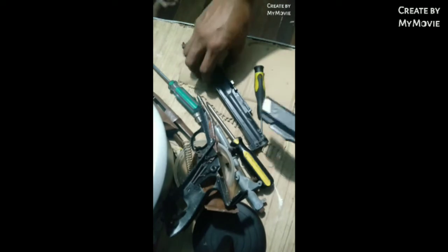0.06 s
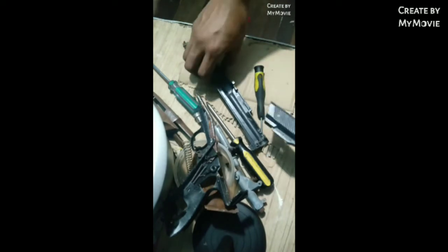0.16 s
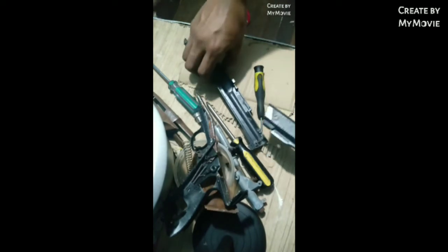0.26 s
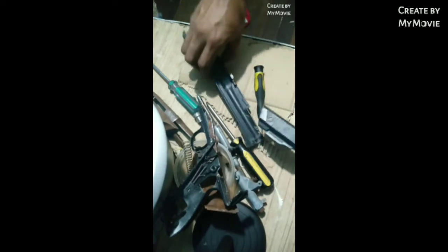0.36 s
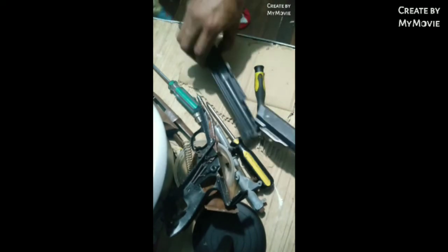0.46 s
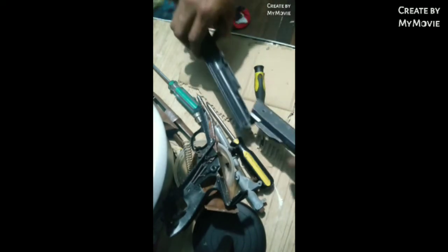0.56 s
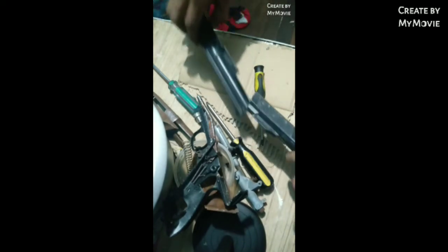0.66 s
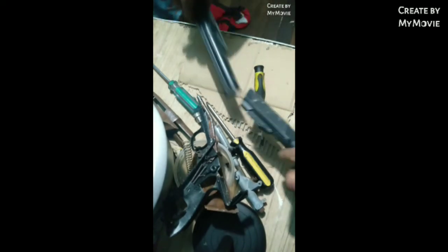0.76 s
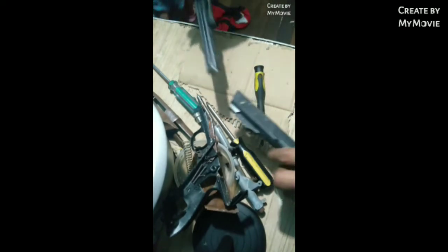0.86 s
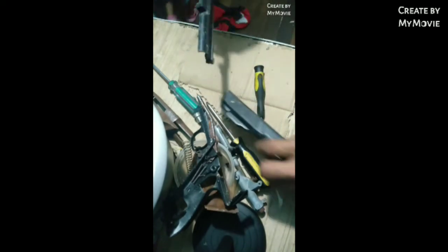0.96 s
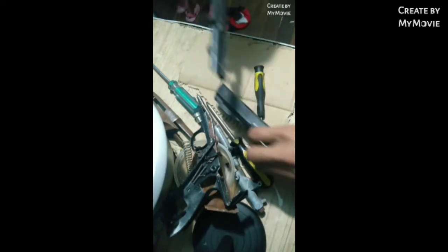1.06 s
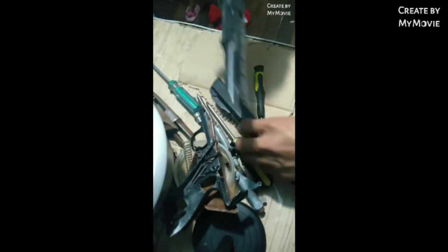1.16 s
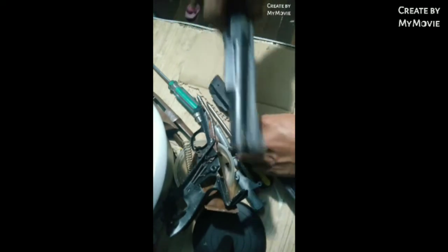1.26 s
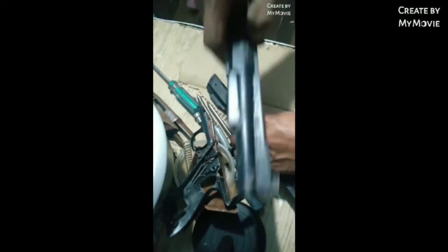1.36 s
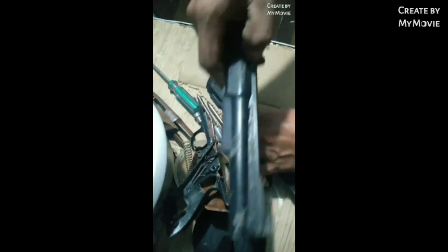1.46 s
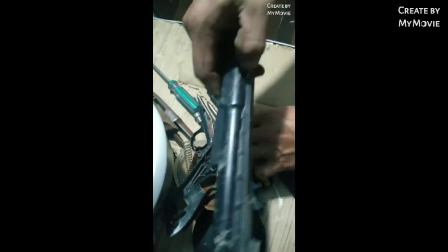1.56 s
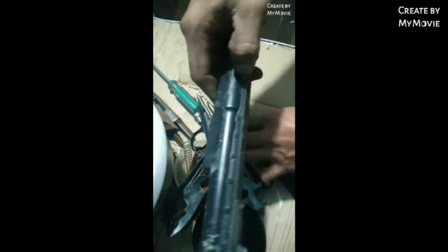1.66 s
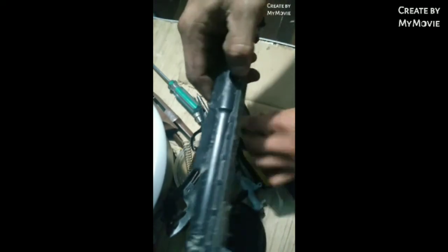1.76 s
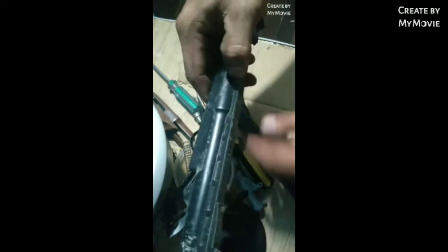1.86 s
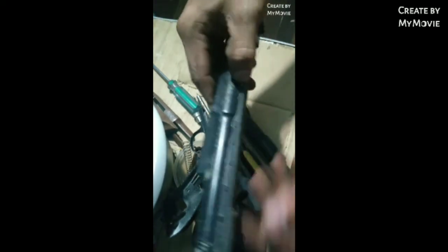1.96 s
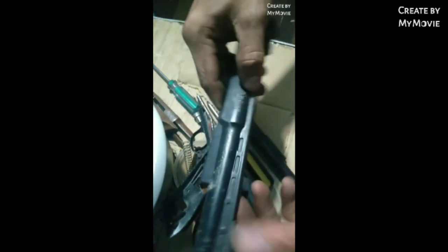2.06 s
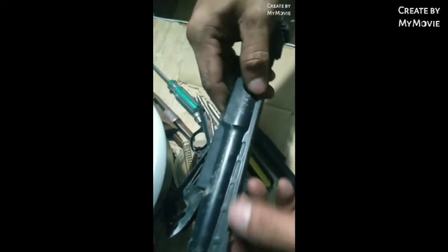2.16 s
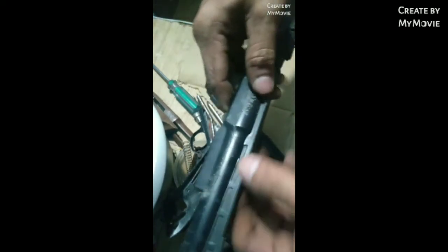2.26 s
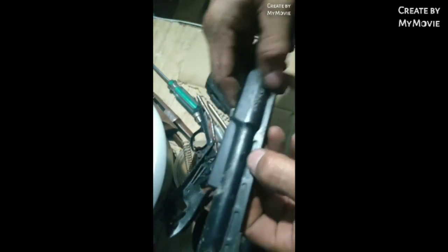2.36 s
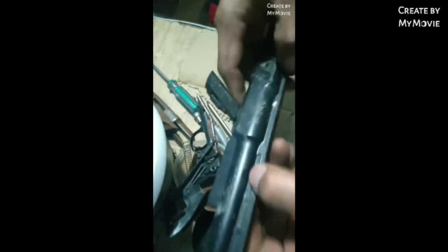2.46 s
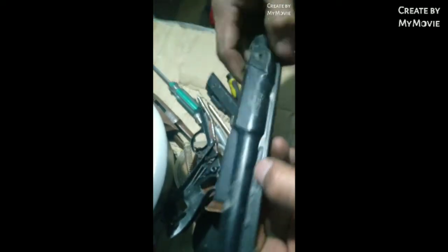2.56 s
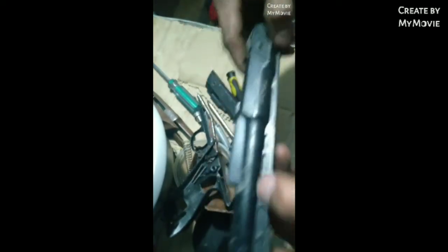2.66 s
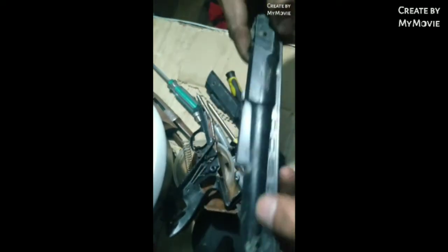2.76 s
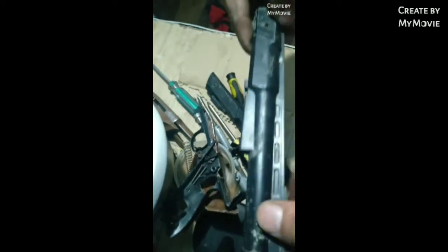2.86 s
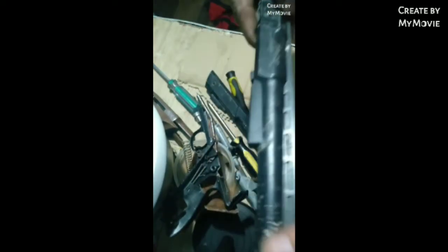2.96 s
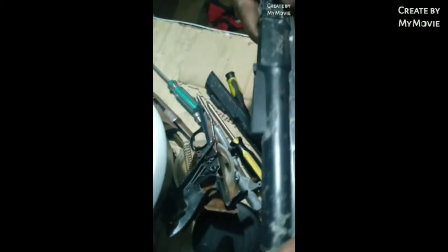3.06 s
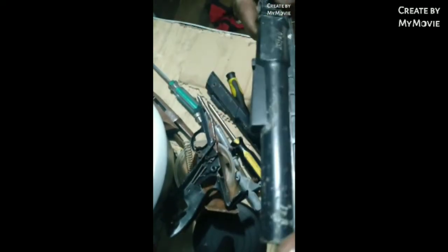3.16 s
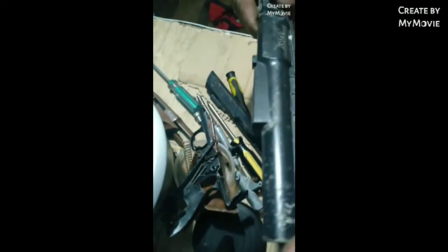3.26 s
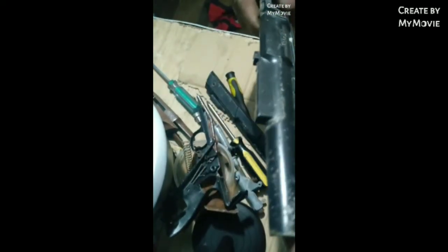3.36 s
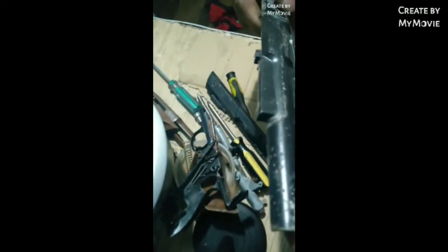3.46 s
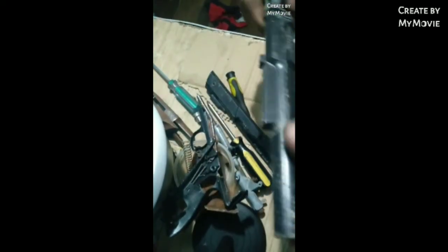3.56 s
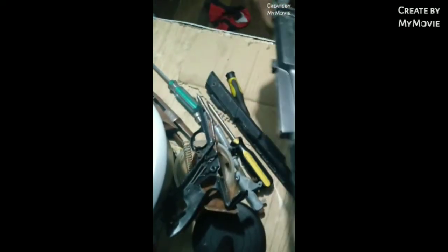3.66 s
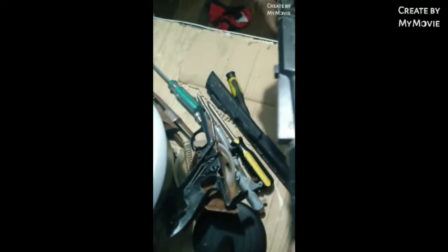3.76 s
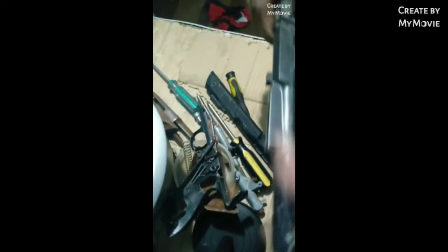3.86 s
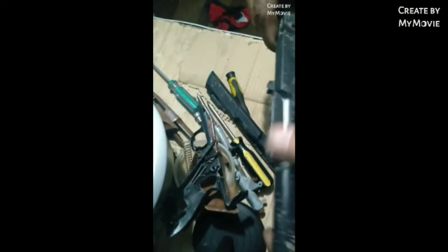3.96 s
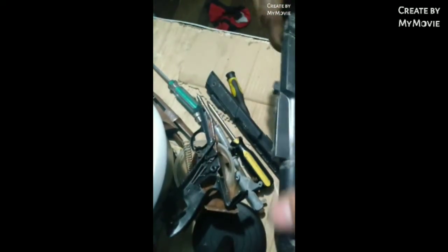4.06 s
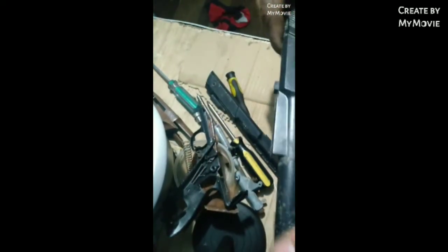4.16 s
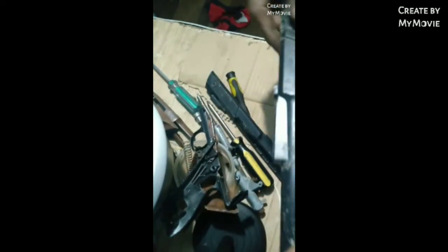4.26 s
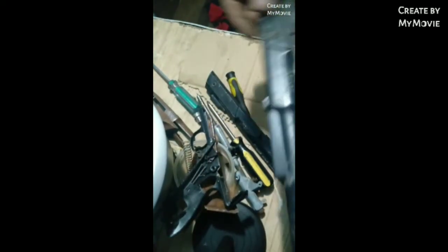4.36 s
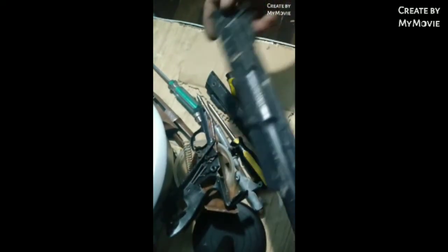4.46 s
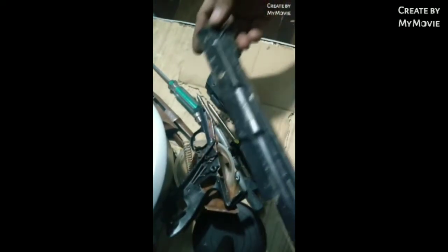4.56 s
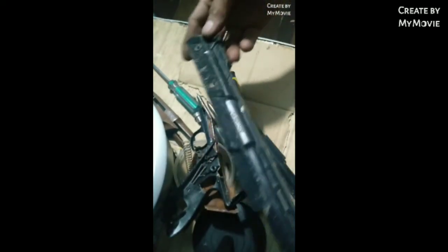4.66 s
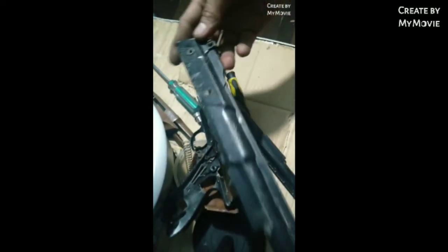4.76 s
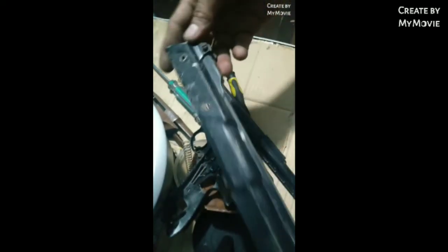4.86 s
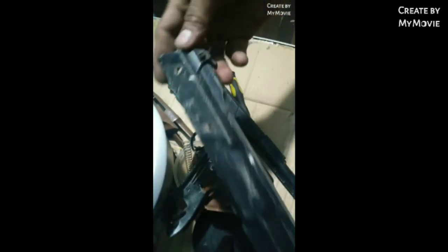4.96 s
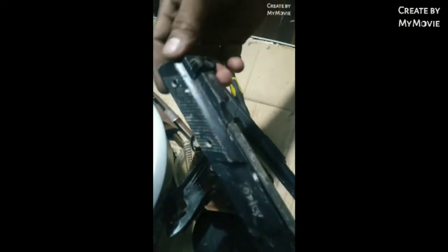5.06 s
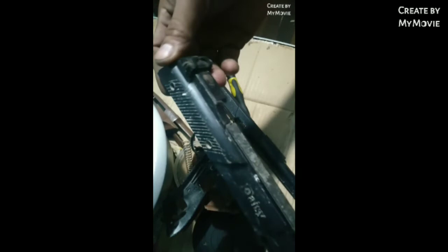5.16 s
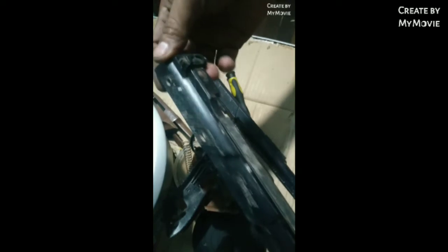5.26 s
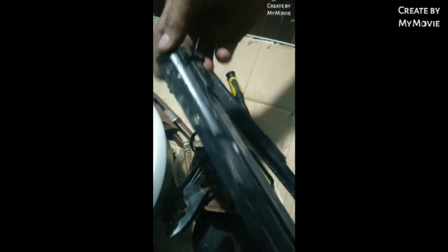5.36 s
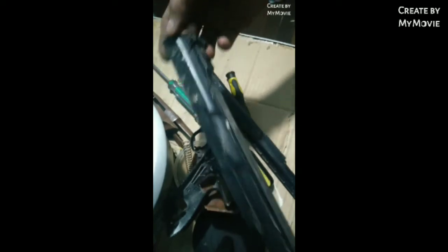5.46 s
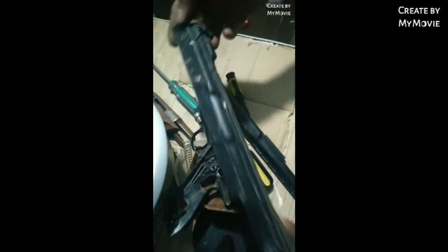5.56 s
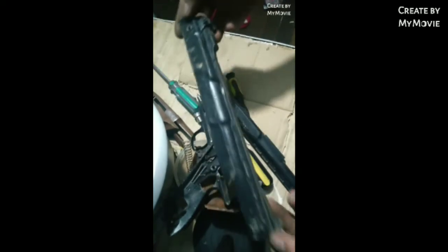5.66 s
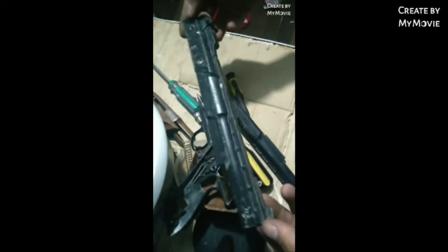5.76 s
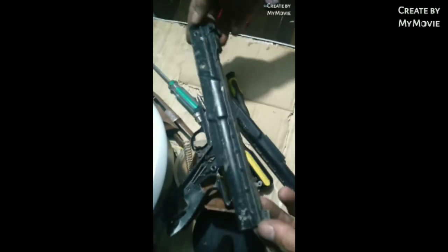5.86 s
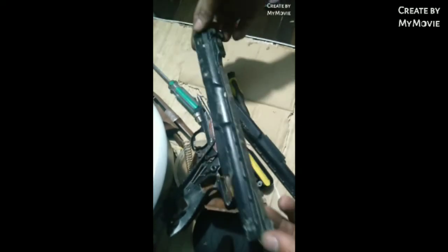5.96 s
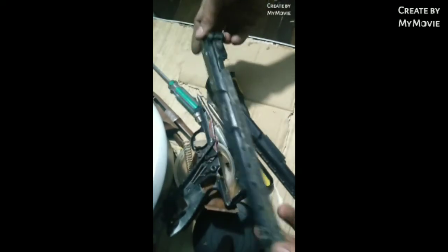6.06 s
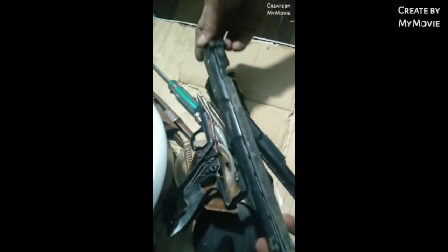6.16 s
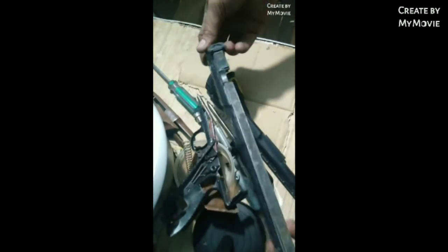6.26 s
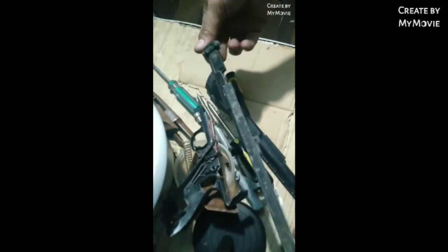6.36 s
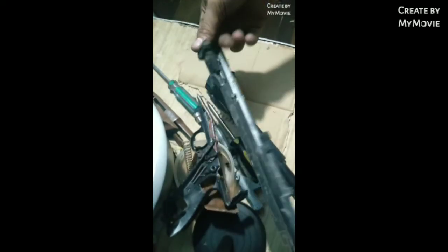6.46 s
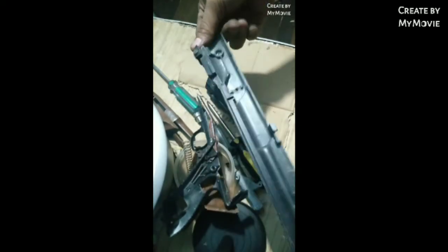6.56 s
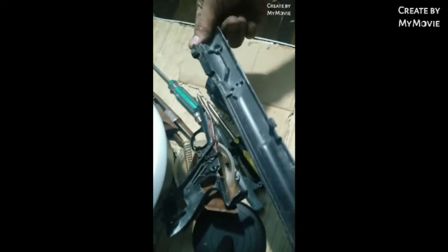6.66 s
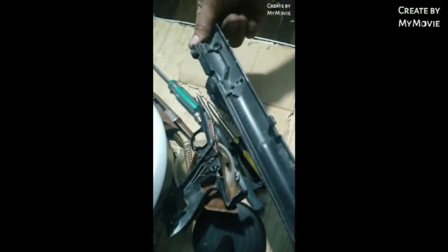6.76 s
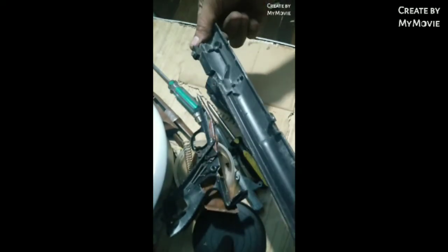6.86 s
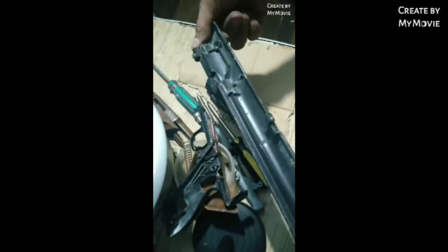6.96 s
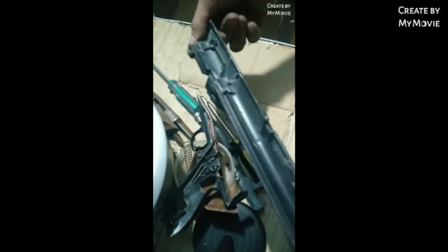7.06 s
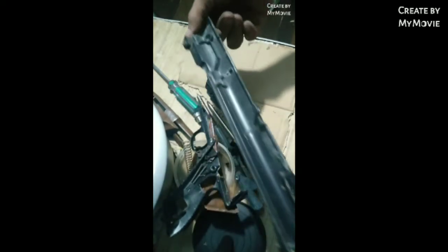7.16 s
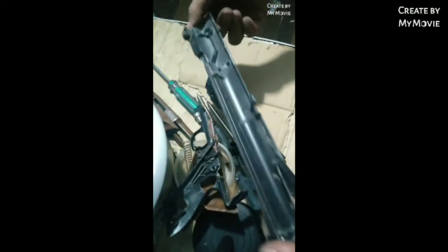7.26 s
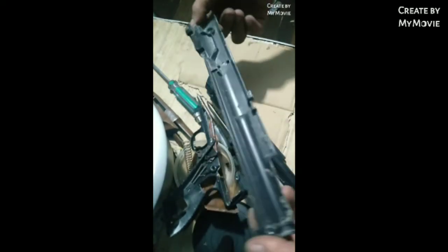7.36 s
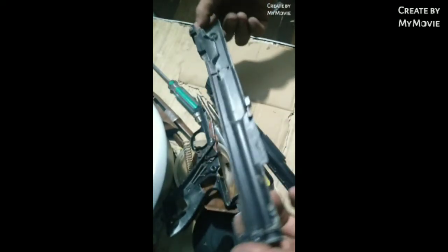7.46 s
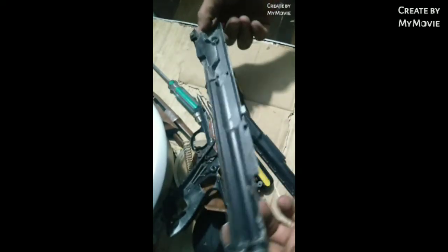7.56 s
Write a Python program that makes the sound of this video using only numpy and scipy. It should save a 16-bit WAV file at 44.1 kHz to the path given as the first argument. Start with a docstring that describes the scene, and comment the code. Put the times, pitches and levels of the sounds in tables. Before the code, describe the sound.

Thin steel tool ticks, then a loud clattering drop onto cardboard, followed by scattered metallic clicks, scrapes and dull knocks over faint hum.

```python
"""In a small room, steel parts and tools are lifted, turned in the hands and dropped on a cardboard sheet.
Contacts are clumped noise bursts that ring steel modes, thuds are damped swings with the sheet's modes.
Fingers slide as patchy noise through resonances, thin wavering tones come and go, cardboard creaks.
A faint fuzzy hum and hiss lie underneath; the microphone's noise suppressor lowers sound near the usual level."""
import sys
import numpy as np
from scipy import signal
from scipy.fft import rfft, irfft
from scipy.io import wavfile
from scipy.ndimage import uniform_filter1d

SR = 44100
rng = np.random.default_rng(int(sys.argv[2]) if len(sys.argv) > 2 else 0)


def store_pcm(level_fs):
    """Save levels as 16-bit WAV."""
    pcm = np.round(np.clip(level_fs, -1, 1) * 32767).astype(np.int16)
    wavfile.write(sys.argv[1], SR, np.atleast_2d(pcm).T)


N = 335380

SUPPRESS_DB = 8  # greatest depth by which the suppressor lowers sound


def amp(db):
    """Amplitude factor of a level in dB."""
    return 10 ** (np.asarray(db) / 20)


def evened(x):
    """The signal scaled to rms 1."""
    return x / np.sqrt(np.mean(x ** 2) + 1e-20)


def peaked(x, db):
    """The signal scaled to a peak level in dB."""
    return amp(db) * x / abs(x).max()


def read(points, hz):
    """A curve of (Hz, value) points, read along log frequency."""
    point_hz, value = np.transpose(points)
    return np.interp(np.log(hz + 1), np.log(point_hz + 1), value)


def add(mix, start_s, sound):
    """Lay a sound into the mix at its start time."""
    part = mix[round(start_s * SR):][:len(sound)]
    part += sound[:len(part)]


def noise(points, size):
    """Noise of rms 1 with the spectrum points (Hz, dB)."""
    spectrum = rfft(rng.standard_normal(size))
    colour = amp(read(points, np.fft.rfftfreq(size, 1 / SR)))
    return evened(irfft(spectrum * colour, size))


def ringing(modes, tilt_db=0, spread_db=0):
    """Impulse response of a body, energy 1; the place struck changes the share of each mode."""
    hz, db, t60_s = np.transpose(modes)[:, :, None]
    t = np.arange(SR // 2) / SR
    db = db + tilt_db * np.log2(hz / 3000) + spread_db * rng.standard_normal(hz.shape)
    swings = np.sin(2 * np.pi * (hz * t + rng.random(hz.shape)))
    response = (amp(db - 60 * t / t60_s) * swings).sum(0)
    return response / np.linalg.norm(response)


def hiss():
    """Steady coloured noise."""
    # hiss spectrum: pitch_hz [Hz], level_db [dB per Hz, relative]
    colour = [(20, -44), (40, -27.5), (70, -15), (110, -3), (160, -20.5), (350, -29), (520, -28),
              (1100, -33.5), (1900, -31.5), (4500, -39), (8600, -35), (10500, -39.5), (13000, -59),
              (15000, -56.5)]
    return amp(-71.5 + SUPPRESS_DB) * noise(colour, N)  # raised to make up for the suppressor


def hum():
    """A steady tone made slightly fuzzy by narrow noise around its pitch."""
    hum_hz, width_hz = 118.5, 56
    t = np.arange(N) / SR
    pole = np.exp(-np.pi * width_hz / SR)
    waver = signal.lfilter([1], [1, -pole], rng.standard_normal((2, N)))
    fuzz = evened(waver[0]) + 1j * evened(waver[1])
    tone = ((3. + fuzz) * np.exp(2j * np.pi * hum_hz * t)).real
    return amp(-70 + SUPPRESS_DB) * evened(tone)


def rustle():
    """Low lumpy creaks of the cardboard as hands shift the pile, and dense pips that follow the same level."""
    # level curve of the shifting pile: time_s [s], level_db [dB, applied to creaks and pips]
    pile_level = [(0.0, -68.5), (0.91, -78.5), (1.099, -53.5), (1.27, -52), (1.59, -84), (1.92, -85),
                  (2.14, -66.5), (3.05, -83.5), (3.941, -68), (4.68, -81), (5.02, -65), (5.44, -70.5),
                  (7.6, -62)]
    time_s, level_db = np.transpose(pile_level)
    lumps_db = 5.4 * evened(uniform_filter1d(rng.standard_normal(N), 1500))
    colour = [(150, -26.5), (240, -1.5), (340, 2), (450, -16.5), (700, -15), (1200, -40.0)]
    sheet = amp(lumps_db + 1.5) * noise(colour, N)
    t = np.arange(2000) / SR
    for hz in np.geomspace(550, 2600, 14):
        # small random pips, about 5 a second at each pitch, of random strength
        pips = (rng.random(N) < 5. / SR) * amp(4. * rng.standard_normal(N))
        pip = np.sin(2 * np.pi * hz * t) * np.hanning(len(t))
        sheet += amp(-9.) * signal.oaconvolve(pips, pip)[:N]
    return sheet * amp(np.interp(np.arange(N) / SR, time_s, level_db))


def slide(swell_s, fade_s, top_db, low_db, high_db):
    """Gritty friction through the part's resonances, in patches as the surfaces catch."""
    # resonances of the rubbed part: pitch_hz [Hz], width_hz [Hz, before 60 Hz of widening],
    # gain_db [dB, before scaling by 1.08]
    resonances = [(684, 58, 4), (1100, 23, -10), (1674, 41, 2.5), (2864, 50, 2.5), (3510, 110, -7),
                  (4450, 87, -13), (6125, 63, 3.5), (6800, 29, -2), (8200, 120, -13), (8593, 88, 1.5),
                  (9195, 190, 2), (11500, 49, -28)]
    start_db, end_db = -20, -7.5  # stroke level at its start and end, against its top
    t = np.arange(0, swell_s + fade_s, 1 / SR)
    swell_db = start_db * (1 - t / swell_s)
    fade_db = end_db * (t - swell_s) / fade_s
    stroke_db = top_db + np.where(t < swell_s, swell_db, fade_db)

    low = noise([(200, -22), (350, 6.5), (800, -10.5), (2000, -10.0), (2600, -32)], len(t))
    mid = noise([(1500, -36), (2200, -3.5), (6500, 4), (8000, -25)], len(t))
    high = noise([(6000, -50), (7500, 9.5), (10500, 6), (14000, -3.0)], len(t))
    friction = mid + amp(low_db) * low + amp(high_db) * high

    hz, _, z = signal.stft(friction, SR, nperseg=512, noverlap=384)
    body = amp(-14.0) + sum(amp(1.08 * gain_db) / (1 + (2 * (hz - pitch_hz) / (width_hz + 60.)) ** 2)
                            for pitch_hz, width_hz, gain_db in resonances)
    patches = uniform_filter1d(rng.standard_normal(z.shape), size=3, axis=0)  # across frequency
    patches = evened(uniform_filter1d(patches, size=14, axis=1))  # along time
    z = z * body[:, None] / body.mean() * amp(6.5 * patches)
    grit = signal.istft(z, nperseg=512, noverlap=384)[1][:len(t)]

    flutter_db = 1.9 * evened(uniform_filter1d(rng.standard_normal(len(t)), 300))
    catch = amp(stroke_db - 8.0 + flutter_db)
    return catch * grit * signal.windows.tukey(len(t), .1)


def slides():
    """Fingers and parts slide along metal, each stroke swelling and fading."""
    # strokes: start_s [s], swell_s [s], fade_s [s], top_db [dB, before an 8 dB trim],
    # low_db [dB, share under about 2 kHz], high_db [dB, share over about 7 kHz]
    strokes = [(2.3, .09, .11, -65, -7.5, 9), (3.835, 0.024, .022, -47.5, -9.5, -7),
               (4.75, .09, .21, -51.5, -5, -4), (6.365, .022, .045, -47, 4.5, -3.5),
               (7.43, .04, .13, -60, 10, -1)]
    out = np.zeros(N)
    for start_s, *stroke in strokes:
        add(out, start_s, slide(*stroke))
    return out


def thin_tones():
    """Thin, narrow wavering tones swell and fade."""
    # tones: start_s [s], length_s [s], pitch_hz [Hz], level_db [dB rms, before the swell and fade]
    tones = [(2.309, 0.17, 4763, -61.5), (2.304, 0.21, 5900, -59), (3.18, 0.18, 4833, -73),
             (4.092, 0.11, 9296, -62), (4.096, .099, 5400, -64.5), (4.75, 0.22, 2844, -60.5),
             (4.807, .098, 1097, -55)]
    out = np.zeros(N)
    for start_s, length_s, hz, db in tones:
        t = np.arange(round(length_s * SR)) / SR
        waver = uniform_filter1d(rng.standard_normal((2, len(t))), 500)
        wobble = 0.33 + evened(waver[0]) + 1j * evened(waver[1])
        tone = (wobble * np.exp(2j * np.pi * hz * t)).real
        add(out, start_s, amp(db) * evened(tone) * signal.windows.tukey(len(t), .6))
    return out


def thuds():
    """The sheet gives a damped swing at its own pitch, with its modes and a dull puff behind it."""
    # thuds on the cardboard: start_s [s], level_db [dB peak], pitch_hz [Hz]
    hits = [(0.019, -48, 269.2), (0.503, -39, 257.9), (0.888, -44, 161.6), (0.979, -27.5, 274.6),
            (1.008, -18.5, 360), (1.205, -11.5, 352.6), (1.268, -21.5, 131.7), (1.367, -39.5, 271.9),
            (1.464, -47, 235), (1.926, -31.5, 219.3), (2.058, -51.5, 126), (2.175, -26.5, 367.3),
            (2.48, -39, 453.8), (3.489, -35, 408), (3.503, -32, 359), (3.544, -25.5, 219.7),
            (3.878, -28.5, 240), (3.95, -28, 230.9), (4.81, -46.5, 703), (5.065, -42.5, 371.2),
            (5.066, -41, 609), (5.169, -46, 130.5), (6.384, -42, 285), (6.44, -32, 286.8),
            (6.714, -42, 340.8), (6.953, -28, 670), (6.952, -35.5, 282), (7.1, -46.5, 335.2),
            (7.129, -41.5, 283)]
    # modes of the sheet: pitch_hz [Hz], level_db [dB, relative], t60_s [s]
    sheet_modes = [(107, 0, .12), (164, -6.5, 0.08), (262, -3, 0.18), (324, 0, 0.091), (708, -15, 0.33),
                   (795, -17.5, .017)]
    out, t = np.zeros(N), np.arange(SR // 2) / SR
    rise = (1 - np.exp(-t / 0.0028)) ** 2
    fade = amp(-60 * t / 0.08)
    for start_s, db, hz in hits:
        swing = fade * np.sin(2 * np.pi * hz * t)
        puff = fade * noise([(50, -20), (hz, 0), (900, -12), (2500, -40), (6000, -80)], len(t))
        sheet = peaked(ringing(sheet_modes, spread_db=3.0), -6.5)
        add(out, start_s, peaked(rise * (swing + amp(-6.0) * puff + sheet), db))
    return out


def taps():
    """A thin tool shaft is tapped: a sharp tick and the ring of the shaft."""
    # taps: start_s [s], level_db [dB peak], brightness_db [dB per octave for the ring,
    # dB at 7 kHz for the tick]
    hits = [(0.1751, -25.5, -3), (0.2365, -26.5, -1.5), (0.2563, -34.5, -2.5), (0.3163, -25.5, 5.1),
            (0.3585, -19.5, 1.4), (0.4094, -34.5, 6)]
    # modes of the shaft: pitch_hz [Hz], level_db [dB, relative], t60_s [s]
    shaft_modes = [(1120, -13, .18), (1355, -18, .15), (1683, -7, .18), (2155, 2, .09), (2515, -6, .09),
                   (3460, -13, .1), (3813, -9, .12), (4275, -10, .09), (4785, -7, .11), (5387, -6, .1),
                   (5920, 0, .04), (8253, -10, .04)]
    out, t = np.zeros(N), np.arange(SR // 2) / SR
    thin = signal.butter(4, 950, "high", fs=SR, output="sos")  # a thin shaft radiates no bass
    rise = 1 - np.exp(-t / 0.00013)
    for start_s, db, tilt_db in hits:
        tick = noise([(1200, -5.5), (7000, tilt_db), (10000, -24.5)], len(t)) * amp(-60 * t / 0.062)
        tap = ringing(shaft_modes, tilt_db, 1.) + amp(-7) * tick / np.linalg.norm(tick)
        add(out, start_s, peaked(signal.sosfilt(thin, tap * rise), db))
    return out


def burst(db, body_db, tilt_db, top_db, rise_ms, t60_ms):
    """A rough rush of tiny collisions that come in clumps."""
    ms = np.arange(SR // 2) * 1000 / SR
    rise = (1 - np.exp(-ms / max(rise_ms, .1))) ** 2
    shape = rise * amp(-60 * ms / t60_ms)
    lumps = uniform_filter1d(uniform_filter1d(rng.standard_normal(len(ms)), 120), 120)
    clumps = amp(3. * np.minimum(ms / 8, 1) * evened(lumps))  # clumping grows over the first 8 ms
    middle_db = .6 * max(body_db, 0) + 0.28 * min(body_db, 0) + 3.5 - tilt_db / 3
    colour = [(250, body_db - 0.6), (1000, body_db - 1.0), (2500, middle_db),
              (3500, 2.0 - tilt_db / 2), (7000, tilt_db / 2),
              (12000, tilt_db / 2 + top_db + 0.5), (14500, tilt_db / 2 + top_db - 18)]
    return peaked(noise(colour, len(ms)) * shape * clumps, db)


def held(t60_s, count=40):
    """A part damped by the grip: many short modes that change with every hold."""
    return [(hz, 0, t60_s) for hz in np.sort(rng.uniform(500, 14000, count))]


def rung(x, modes, ring_db, spread_db):
    """The sound x and the ring it wakes in a body."""
    ring = signal.fftconvolve(x, ringing(modes, spread_db=spread_db))[:len(x)]
    return x + amp(ring_db) * ring * np.linalg.norm(x) / np.linalg.norm(ring)


def drops():
    """A loose steel part drops on the pile and rattles; it rings freely in all its modes."""
    # drops: start_s [s], level_db [dB peak of the clatter, before the ring joins],
    # brightness_db [dB per octave for the ring, scaled for the clatter], t60_ms [ms, clatter]
    falls = [(0.974, -16.5, -7, 97), (1.192, -15.5, 2.5, 74), (1.206, -12, -0.5, 69),
             (1.234, -19.5, -0.5, 79), (1.259, -21, -4.5, 130), (1.282, -27, -4, 73)]
    # modes of the loose steel: pitch_hz [Hz], level_db [dB, relative], t60_s [s]
    steel_modes = [(2160, -9, .15), (2510, -8, .17), (3462, -2, .17), (3811, -7, .2), (3930, -12, .15),
                   (4888, -3, .17), (5134, -1, .16), (5671, 0, .16), (6514, -14, .17), (6901, -11, .17),
                   (7140, -7, .13), (7450, -12, .17), (8664, -4, .3), (9606, -4, .15), (9918, -7, .12),
                   (10389, -5, .17), (11000, -8, .13), (12350, -13, .15), (13300, -14, .15),
                   (13906, -13, .13)]
    out, t = np.zeros(N), np.arange(SR // 2) / SR
    rise = 1 - np.exp(-t / 0.0016)
    for start_s, db, tilt_db, t60_ms in falls:
        clatter = burst(db, 1, 0.55 * tilt_db, -5.0 + 1.8 * tilt_db, 0.82, t60_ms)
        ring = ringing(steel_modes, tilt_db) * rise
        add(out, start_s, clatter + amp(.3) * np.linalg.norm(clatter) * ring)
    return out


def contacts():
    """Parts in the hand touch: a crack wakes short damped modes and one stronger pitch."""
    # contacts: start_s [s], level_db [dB peak], body_db [dB, 1 kHz body over 5 kHz crack, nominal],
    # brightness_db [dB per octave, nominal], t60_ms [ms, crack], ring_hz [Hz]
    touches = [(0.047, -43, -11.5, -4.5, 46, 5663), (0.883, -38.5, -9, -12.5, 89, 2240),
               (0.932, -32.5, -5.5, 6.5, 140, 2090), (0.947, -36.5, -8, -0.5, 93, 5600),
               (1.918, -34.5, 25, -18, 76, 1470), (2.175, -25, 24, 13, 92, 795),
               (2.477, -29, 12.5, 0, 100, 1770), (2.51, -31.5, 25.5, 18, 110, 650),
               (2.548, -31, -2.5, 6.5, 70, 9270), (2.608, -42, -20, -8, 100, 5760),
               (3.271, -39, 1.5, 26, 190, 8930), (3.484, -27.5, 2.5, -20, 220, 869),
               (3.497, -23, -14.5, -2, 43, 3196), (3.505, -16, 4.5, 8.5, 95, 919.6),
               (3.639, -37.5, -6.5, 16, 200, 8950), (3.875, -21.5, 7, 4.5, 120, 2910),
               (3.919, -31.5, 2.5, 3, 227, 9420), (4.14, -49.5, 13.5, 21.5, 90, 9360),
               (4.947, -37.5, -15, 2.5, 160, 2810), (4.986, -40, -15, 10, 98, 9540),
               (5.057, -33.5, 3, 4.5, 130, 3394), (5.274, -48.5, 10, 5, 160, 982),
               (5.736, -43.5, 7.5, 10.5, 66, 9850), (6.023, -39, -14.5, 15, 93, 8900),
               (6.185, -51, 28.5, 9, 42, 838), (6.437, -20.5, 1.5, 0.5, 110, 694),
               (6.714, -41.5, -13.5, -8, 45, 3110), (6.945, -22, -7.5, -7.5, 88, 2300),
               (7.128, -47.5, 8.5, -28, 87, 2160), (7.464, -41, 10, -34, 140, 670),
               (7.526, -35.5, 18.5, -24, 230, 694), (7.551, -32.5, 6, 1, 52, 2483)]
    out = np.zeros(N)
    for start_s, db, body_db, tilt_db, t60_ms, hz in touches:
        # ring share falls as level rises, so quiet contacts are more tonal
        ring_db = -4. - .5 * (db + 25)
        top_db = -10 + 0.33 * tilt_db  # the treble above 7 kHz partly follows the brightness
        blow = burst(db, body_db, tilt_db, top_db, t60_ms / 50.0, t60_ms)
        modes = held(0.019) + [(hz, 8., .06)]
        add(out, start_s, peaked(rung(blow, modes, ring_db, spread_db=6.5), db))
    return out


def room(x):
    """Sparse taps of random sign, each band dying at its own speed."""
    # room decay: pitch_hz [Hz], t60_s [s]
    decay = [(120, 0.79), (400, 0.3), (2000, 0.36), (6000, 0.28), (13000, 0.38)]
    tail = np.zeros(SR // 2)
    at = np.arange(150, len(tail) - 20, 20)
    tail[at + rng.integers(0, 20, len(at))] = rng.choice([-1., 1.], len(at))
    hz, t, z = signal.stft(tail, SR, nperseg=256)
    fade = amp(-60 * t / read(decay, hz)[:, None])
    tail = signal.istft(z * fade, SR, nperseg=256)[1]
    return signal.fftconvolve(x, tail / np.linalg.norm(tail))[:N]


def scene():
    """The handled parts in their room, over the rustle, hiss and hum."""
    near = slides() + thin_tones() + thuds() + taps() + drops() + contacts()
    small = signal.butter(3, 95, "high", fs=SR, output="sos")  # the handled sounds lose their low end below about 95 Hz
    near = signal.sosfilt(small, near)
    return (near + amp(-6) * room(near) + rustle() + hiss() + hum())[None]


def record(dry):
    """A suppressor lowers every bin that stands near its usual level; then the band limit."""
    z = signal.stft(dry[0], nperseg=1024, noverlap=768)[2]
    power = uniform_filter1d(abs(z) ** 2, size=3, axis=0)
    power = uniform_filter1d(power, size=7, axis=1) + 1e-20
    usual = np.percentile(power, 30, axis=1, keepdims=True)
    keep = np.sqrt(np.clip(1 - amp(2.0) * usual / power, amp(-2 * SUPPRESS_DB), 1))
    quiet = signal.istft(z * keep, nperseg=1024, noverlap=768)[1][None, :N]
    band = signal.firwin(255, 14300, window=("kaiser", 7), fs=SR)  # low-pass edge in Hz
    return signal.oaconvolve(quiet, band[None], "same")


dry = scene()
out = record(dry)
store_pcm(out)
```